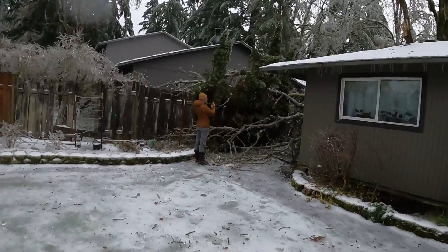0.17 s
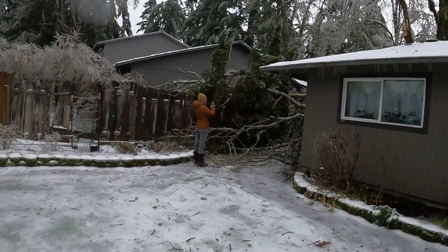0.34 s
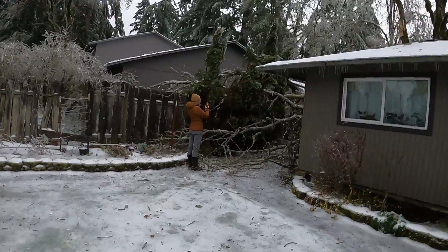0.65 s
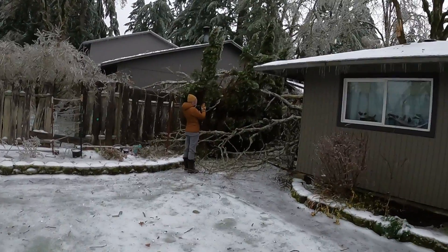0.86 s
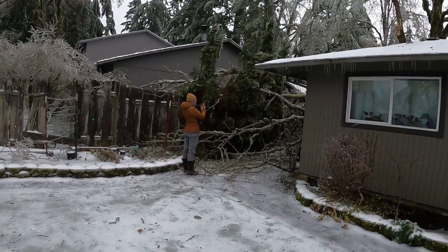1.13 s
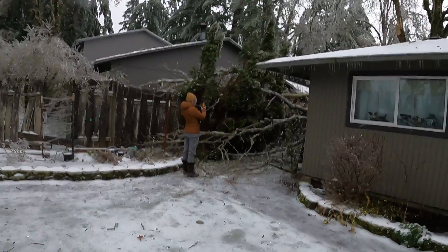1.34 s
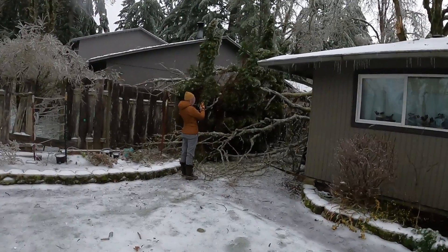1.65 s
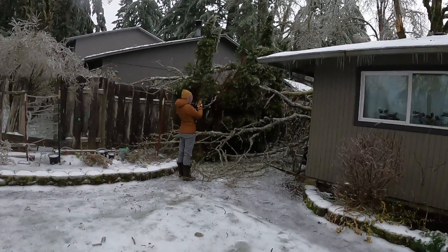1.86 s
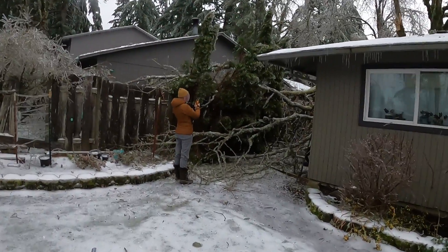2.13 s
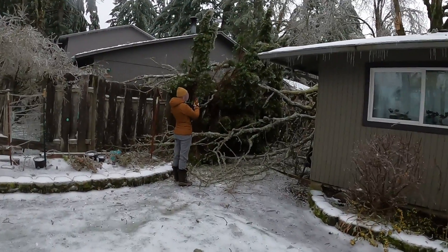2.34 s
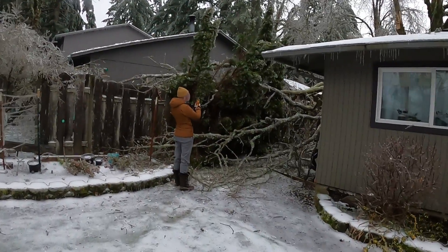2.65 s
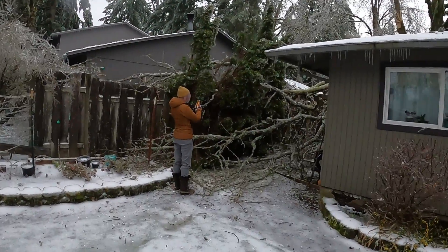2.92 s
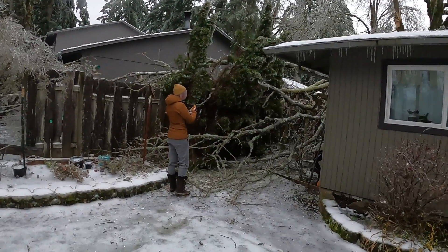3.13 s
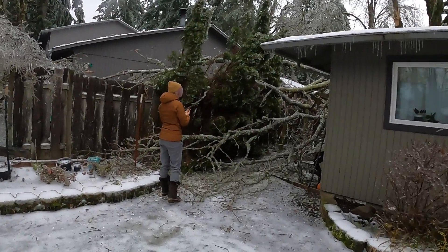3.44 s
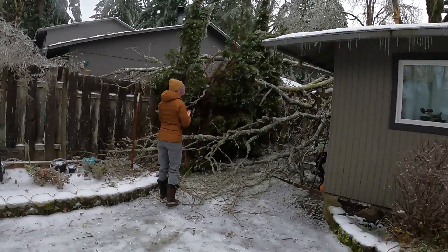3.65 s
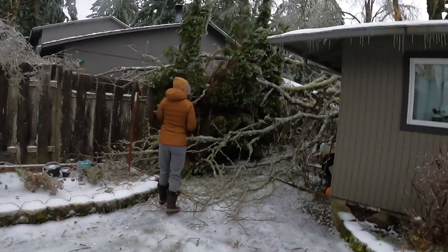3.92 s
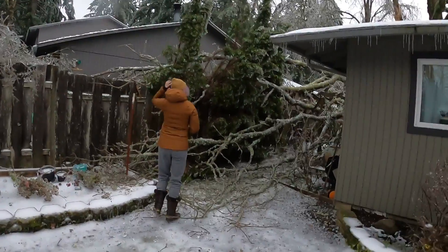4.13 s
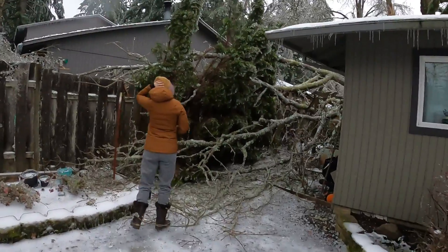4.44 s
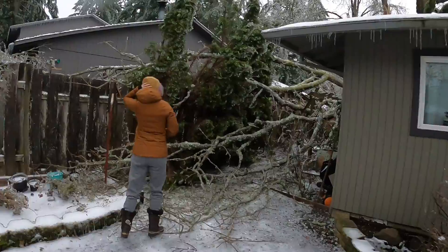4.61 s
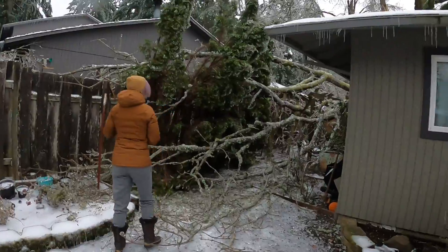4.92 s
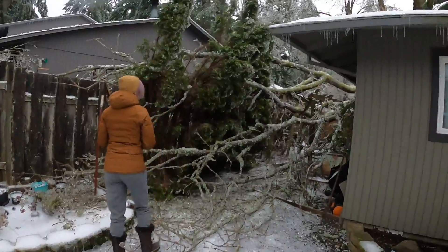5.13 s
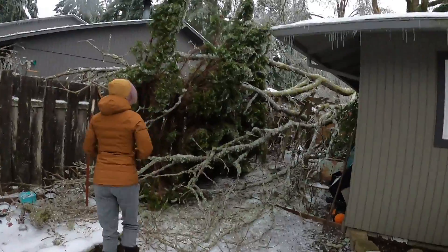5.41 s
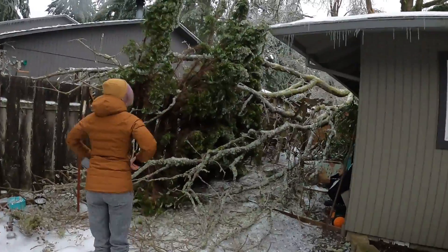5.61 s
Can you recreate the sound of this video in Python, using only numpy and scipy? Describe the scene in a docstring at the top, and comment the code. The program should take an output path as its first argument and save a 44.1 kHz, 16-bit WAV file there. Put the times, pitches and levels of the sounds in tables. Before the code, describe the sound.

Close footsteps break through frozen crust outdoors, crackling, scraping and thudding hollowly, with quiet open air and low wind rumble behind.

```python
"""Boots crunch over a yard glazed by freezing rain: heel crush, sole roll, cracks, chunks and scrapes.
The crunch is filtered noise and grain streams that follow a load curve; cracks are noise bursts.
The loose sheet thumps in falling chirps and sings in wave packets around 1.1-1.3 kHz.
House wall and fence return a faint echo; behind it lie outdoor hush and a low, swelling air rumble."""
import sys
import numpy as np
from scipy import signal
from scipy.fft import rfft, irfft
from scipy.io import wavfile
from scipy.ndimage import uniform_filter1d

SR = 44100
rng = np.random.default_rng(int(sys.argv[2]) if len(sys.argv) > 2 else 0)


def persist_wave(psi):
    """Save psi, clipped to +-1, as 16-bit WAV."""
    counts = np.round(np.clip(psi, -1, 1) * 32767).astype(np.int16)
    wavfile.write(sys.argv[1], SR, np.atleast_2d(counts).T)


N = 254456
TIME = np.arange(N) / SR
BEAT = TIME[::32]  # coarse time grid of the load curves

# ways of breaking: (fall-off away from the centre pitch/dB per octave, tear length/s)
DRY, CLEAR, RINGING = (8, 0.0012), (9.9, 0.0018), (31, 0.00046)
TORN, CRUSHED, SCRAPED = (7.5, 0.0043), (6.4, .013), (20, .012)
# centre pitch by size of the breaking piece, f/Hz
PLATE, SLAB, SHARD, CHIP, FLAKE = 1184, 1795, 2350, 3160, 4720
# cracks, crushed chunks, scrapes: (t/s, relative level/dB, centre f/Hz, way of breaking)
CRACKS = [(0.02, -31, SLAB, CRUSHED), (0.149, -24.5, CHIP, TORN), (0.2167, -28.5, CHIP, TORN),
          (0.227, -26, FLAKE, CRUSHED), (0.2922, -30.5, FLAKE, TORN), (0.3708, -28.5, CHIP, DRY),
          (0.433, -34.5, PLATE, SCRAPED), (0.471, -37, CHIP, DRY), (0.509, -31, FLAKE, TORN),
          (0.52, -29.5, SHARD, TORN), (0.6504, -25.5, SLAB, TORN), (0.666, -25, SLAB, CLEAR),
          (0.708, -28, 1150, SCRAPED), (0.7284, -24.5, SLAB, CLEAR), (0.737, -25.5, 765, CLEAR),
          (0.775, -28, CHIP, TORN), (0.785, -26, CHIP, CRUSHED), (0.8796, -33, SHARD, DRY),
          (0.968, -40, FLAKE, DRY), (1.012, -43.5, FLAKE, DRY), (1.1753, -32, 3700, CLEAR),
          (1.2109, -36, FLAKE, TORN), (1.2343, -39.5, FLAKE, DRY), (1.2767, -30.5, SLAB, DRY),
          (1.3114, -25.5, FLAKE, TORN), (1.323, -27.5, CHIP, CRUSHED), (1.4083, -25, FLAKE, CLEAR),
          (1.433, -25.5, SHARD, TORN), (1.444, -29, PLATE, SCRAPED), (1.457, -25, SLAB, TORN),
          (1.5225, -25.5, SHARD, TORN), (1.5468, -30.5, SLAB, RINGING), (1.572, -36, CHIP, TORN),
          (1.621, -28.5, SHARD, RINGING), (1.654, -30.5, SHARD, TORN), (1.71, -32.5, FLAKE, DRY),
          (1.823, -36, FLAKE, TORN), (1.865, -32.5, SHARD, CLEAR), (1.9641, -29.5, PLATE, CLEAR),
          (1.976, -25.5, SLAB, CLEAR), (1.983, -27, FLAKE, TORN), (2.01, -28, CHIP, TORN),
          (2.081, -35.5, FLAKE, TORN), (2.099, -33.5, CHIP, CLEAR), (2.138, -30.5, CHIP, TORN),
          (2.1669, -30, SHARD, TORN), (2.184, -36, CHIP, TORN), (2.339, -31.5, SHARD, DRY),
          (2.3479, -31, PLATE, DRY), (2.4306, -32.5, FLAKE, DRY), (2.542, -30.5, 5595, TORN),
          (2.582, -25, 3600, RINGING), (2.624, -24.5, CHIP, CRUSHED), (2.664, -28.5, 1665, RINGING),
          (2.7022, -29.5, CHIP, RINGING), (2.7343, -36.5, SHARD, DRY), (2.776, -33.5, SHARD, DRY),
          (2.826, -29, SHARD, TORN), (3.053, -43.5, SLAB, DRY), (3.1478, -36.5, SHARD, TORN),
          (3.286, -27.5, SHARD, TORN), (3.318, -25, PLATE, SCRAPED), (3.451, -32, SLAB, SCRAPED),
          (3.54, -35, SLAB, CRUSHED), (3.594, -42.5, PLATE, TORN), (3.751, -24.5, CHIP, CRUSHED),
          (3.774, -24, PLATE, SCRAPED), (3.7869, -34, CHIP, CLEAR), (3.808, -31.5, PLATE, RINGING),
          (3.856, -32.5, FLAKE, DRY), (3.932, -32, SLAB, RINGING), (3.959, -26, CHIP, CRUSHED),
          (3.994, -25.5, SLAB, CRUSHED), (4.023, -26, SLAB, TORN), (4.063, -26, CHIP, TORN),
          (4.083, -23, 1414, RINGING), (4.103, -36, 1500, SCRAPED), (4.1538, -30.5, CHIP, CLEAR),
          (4.17, -27.5, 1487, SCRAPED), (4.2706, -24.5, 3670, CLEAR), (4.291, -32, SLAB, SCRAPED),
          (4.413, -33, SLAB, CRUSHED), (4.448, -29.5, 750, CRUSHED), (4.4827, -32.5, SHARD, TORN),
          (4.5876, -24.5, CHIP, CLEAR), (4.606, -26, 1483, RINGING), (4.643, -32.5, FLAKE, RINGING),
          (4.6968, -30.5, CHIP, TORN), (4.829, -37.5, SLAB, CRUSHED), (4.975, -37, FLAKE, DRY),
          (5.069, -37, 7150, CLEAR), (5.108, -27.5, CHIP, TORN), (5.131, -20.5, 1404, RINGING),
          (5.163, -24.5, SHARD, CRUSHED), (5.177, -28.5, SLAB, SCRAPED), (5.2895, -24, SLAB, TORN),
          (5.3084, -25.5, SLAB, TORN), (5.339, -22, SHARD, CRUSHED), (5.3739, -29, PLATE, CLEAR),
          (5.388, -33, 1487, SCRAPED), (5.3962, -34, FLAKE, DRY), (5.465, -29, 1500, SCRAPED),
          (5.486, -33, SLAB, TORN), (5.6194, -27, PLATE, TORN), (5.689, -31, PLATE, TORN)]
# base pitch of the singing sheet, higher where the ice is thinner: (t/s, f/Hz)
SHEET = [(1.5, 1108), (3.8, 1186), (4.6, 1276)]
# footfalls: (t/s, heel hold/s, heel level/dB, roll hold/s, roll level/dB, singing re crunch/dB,
# shudder re crunch/dB, thump level/dB, thump nominal f/Hz, ground thud level/dB), levels relative
STEPS = [(0.0, 0.02, -30.5, 0.32, -36, 2.3, -3, -24, 218, -35),
         (0.643, 0.033, -32, .18, -39, 2.8, -3.5, -20.5, 165, -29.5),
         (1.31, 0.034, -32.5, 0.31, -39, 2, -5, -24, 153, -29.5),
         (1.967, 0.039, -30.5, 0.29, -44.5, 1.1, -8, -12.5, 137, -24.5),
         (2.619, 0.023, -32.5, 0.24, -46, 4.7, 5, -24, 132, -31),
         (3.28, 0.043, -28, 0.14, -37, 1.12, -2.5, -21.5, 159.4, -33),
         (3.751, 0.016, -32.5, 0.25, -44.5, 2.2, -3, -19, 151, -37.5),
         (3.957, 0.038, -26.5, 0.27, -38.5, 0.92, 3, -17.5, 151, -29),
         (4.586, 0.024, -34, 0.13, -40, 2.2, -0.5, -37, 198, -58),
         (5.106, 0.055, -29.5, 0.2, -41, 2.96, -5, -17.5, 208, -38),
         (5.277, 0.033, -35, 0.6, -44.5, 2.3, 7, -18.5, 130.4, -44)]
GIVE_SHARE = .48  # share of the heel hold after which the sheet gives


def amp(db):
    """Decibels to gain."""
    return 10 ** (np.asarray(db) / 20)


def evened(x):
    """Scales to an rms of one."""
    return x / np.sqrt(np.mean(x ** 2) + 1e-20)


def read(points, hz):
    """Reads a spectrum on a log-frequency axis."""
    f, value = np.transpose(points)
    return np.interp(np.log(hz + 1), np.log(f + 1), value)


def curve(rows, index):
    """One column of a time table, at every sample."""
    columns = np.transpose(rows)
    return np.interp(TIME, columns[0], columns[index])


def add(mix, s, sound):
    """Mixes a sound in at time s."""
    part = mix[:, max(round(s * SR), 0):][:, :sound.shape[-1]]
    part += sound[..., :part.shape[1]]


def colour(x, points, size=2048):
    """Minimum-phase filter with the given spectrum, so that attacks stay sharp."""
    gain_db = read(points, abs(np.fft.fftfreq(size, 1 / SR)))
    taps = np.fft.ifft(np.exp(signal.hilbert(np.log(amp(gain_db))).conj())).real
    return signal.oaconvolve(x, taps[None, :size // 2], axes=1)[:, :x.shape[1]]


def pair(three, apart, left_db):
    """Two ports share the first of three signals; each adds some of another of its own."""
    return (three[0] + apart * three[1:]) * amp([[left_db / 2], [-left_db / 2]])


def clicks(per_s, spread_db, channels=3):
    """Random trains of tiny fractures of unequal size and random sign."""
    out = np.zeros((channels, N))
    at = rng.random((channels, N)) < per_s / SR
    size, sign = rng.random((at.sum(), 2)).T
    out[at] = amp(spread_db * np.minimum(-np.log(size), 3)) * np.sign(sign - .5)
    return out


def steadied(x, seconds):
    """Evens the running power of a grain stream over the given time; single grains stay."""
    power = uniform_filter1d(x.mean(0) ** 2, max(int(seconds * SR), 2))
    return x / np.sqrt(abs(power) + .02 * power.mean())


def piece(hz, focus_db=7, width=1.0, count=64):
    """Colour of a breaking piece of ice: emphasis near a pitch set by its size."""
    # general crack spectrum: (f/Hz, relative level/dB)
    crack_colour = [(150, 16.5), (3800, 1.5), (7700, 1), (8800, -10), (12500, -11), (16000, -45)]
    grid = np.geomspace(60, 16000, count)
    return np.c_[grid, read(crack_colour, grid) - focus_db * np.hypot(width, np.log2(grid / hz))]


def flex(hz, swell=0.73, glide=1.05, count=2048):
    """Bending waves run faster at high pitch, so a blow arrives as a falling chirp of a few cycles."""
    age = np.arange(count) / SR * hz / swell
    turns = np.cumsum(hz * (0.8 + glide * np.exp(-1.2 * age))) / SR
    envelope = (age * np.exp(1 - age)) ** 2
    return envelope * np.sin(2 * np.pi * (turns + rng.random()))


def air(count=24):
    """Quiet outdoor hush, and a rumble of moving air that swells and sinks at the microphone."""
    # hush spectrum: (f/Hz, relative level/dB)
    hush_colour = [(25, -2), (65, 3), (400, -10.5), (800, -19), (1200, -16.5), (7000, -22), (16000, -45)]
    # rumble: (t/s, relative level/dB)
    rumble_level = [(0.0, -62), (0.85, -44.5), (1.05, -65), (1.25, -51), (1.7, -58.5), (2.65, -51.5),
                    (3.05, -60), (3.6, -47), (4.4, -51.5), (4.8, -64), (5.77, -48)]
    hush = evened(colour(pair(rng.standard_normal((3, N)), apart=.3, left_db=1), hush_colour, size=8192))
    swell_hz = np.geomspace(1, 8, count)
    swell = evened(sum(np.sin(2 * np.pi * (hz * TIME + rng.random())) for hz in swell_hz))
    draught = pair(rng.standard_normal((3, N)), apart=.2, left_db=1) * amp(2.5 * swell)
    band = signal.butter(2, [24, 90], "bandpass", fs=SR, output="sos")
    rumble = evened(signal.sosfilt(band, draught))
    return amp(-56.0) * hush + amp(curve(rumble_level, index=1) + 1.0) * rumble


def yard(x, t60=0.44, count=16384, order=3):
    """Sparse decaying echoes from wall, fence and far ice; three patterns take turns every second."""
    t, out = np.arange(count) / SR, np.zeros((2, N))
    echo_colour = [(700, -4.0), (1250, 15.0), (2500, 10.5), (8000, -3.5)]  # (f/Hz, relative level/dB)
    for k in range(order):
        taps = clicks(per_s=960, spread_db=1.5, channels=2)[:, :count]
        taps = taps * amp(-60 * t / t60) * (t > .004)
        tail = colour(taps, echo_colour) / np.linalg.norm(taps[0])
        share = np.maximum(np.sin(2 * np.pi * (TIME + k / order)), 0)
        out += signal.oaconvolve(x * share, tail, axes=1)[:, :N]
    return out


def press(s, hold_s, db, rise_s, fall_db_per_s):
    """Power of one push on the crust: it rises, holds until hold_s after its start and dies away."""
    age = BEAT - s
    fall_db = fall_db_per_s * np.maximum(age - hold_s, 0)
    return (np.clip(age / rise_s, 0, 1) * amp(db - fall_db)) ** 2


def tread(rest_db=-72):
    """Load of heels, rolling soles and scuffs: rows of (t/s, crunch/dB, singing/dB, shudder/dB)."""
    # scuffs and weight shifts: (t/s, hold/s, relative crunch level/dB, singing re crunch/dB)
    scuffs = [(0.136, 0.078, -36.5, 3), (0.495, 0.12, -43, 4.5), (1.202, 0.13, -47.5, 4),
              (1.839, 0.13, -43.5, -3), (2.119, 0.017, -34.5, 0.5), (2.333, 0.16, -43.5, 1.5),
              (2.551, 0.04, -41.5, 10.5), (3.06, 0.19, -53.5, 7), (3.475, 0.088, -56, 8),
              (4.38, 0.207, -40, 2.5), (4.801, 0.095, -51, 3.5), (4.96, 0.15, -52, 6),
              (5.217, 0.041, -33, -2), (5.343, 0.02, -38, 5)]
    heel_sings_db = -1.5  # the heel pins the sheet and damps it
    crack_sings_db, sing_rise_s, sing_fall_db_per_s, sheet_ring_s = -9, 0.0049, 330, 0.014
    crush, sing, shake = np.full((3, len(BEAT)), amp(rest_db) ** 2)
    for s, heel_s, heel_db, roll_s, roll_db, sing_db, shudder_db, *_ in STEPS:
        heel = press(s, heel_s, heel_db, rise_s=.004, fall_db_per_s=485)
        roll = press(s, roll_s, roll_db, rise_s=0.1, fall_db_per_s=121)
        crush = crush + heel + roll
        sing = sing + amp(sing_db) ** 2 * (amp(heel_sings_db) ** 2 * heel + roll)
        shake = shake + amp(shudder_db) ** 2 * (heel + roll)
    for s, hold_s, db, sing_db in scuffs:
        scuff = press(s, hold_s, db, rise_s=0.0032, fall_db_per_s=215)
        crush, sing, shake = crush + scuff, sing + amp(sing_db) ** 2 * scuff, shake + scuff
    for s, db, hz, _ in CRACKS:
        push = press(s, sing_rise_s, db + crack_sings_db, sing_rise_s, sing_fall_db_per_s)
        sing = sing + push * (SHEET[0][1] / hz) ** 2  # low cracks excite the sheet more
    keep = np.exp(-BEAT[1] / sheet_ring_s)
    sing = signal.lfilter([1 - keep], [1, -keep], sing)  # the sheet rings on
    return np.c_[BEAT, 10 * np.log10(np.c_[crush, sing, shake])]


def uneven_yield(weight, uneven_s=.018, uneven_db=0.48):
    """The crust yields by small fits and starts: all levels wander together."""
    t = weight[:, 0]
    fits = evened(uniform_filter1d(rng.standard_normal(len(t)), max(int(uneven_s / t[1]), 2)))
    return np.c_[t, weight[:, 1:] + (uneven_db * fits)[:, None]]


def singing(weight, width=.15, cycles=7, count=16):
    """Bending waves matching the speed of sound radiate as wave packets; pitch sinks after each blow."""
    glide, glide_s = .22, .03  # share by which the pitch starts higher, and its decay time
    out = np.zeros((3, N))
    fresh = np.max([(BEAT >= s) * np.exp(-abs(BEAT - s) / glide_s) for s, *_ in CRACKS + STEPS], 0)
    pitch_hz = curve(SHEET, index=1) * (1 + glide * np.interp(TIME, BEAT, fresh))
    turns = np.cumsum(pitch_hz) / SR
    for step in np.linspace(-1, 1, count):
        ratio = np.exp(width * (step + step ** 3))  # patches of thicker and thinner ice
        packet = signal.windows.hann(int(cycles * rng.uniform(.5, 1.3) * SR / SHEET[0][1]) + 2)
        kicks = clicks(per_s=14, spread_db=3) * np.exp(2j * np.pi * rng.random(N))
        packets = signal.oaconvolve(kicks, packet[None], axes=1)[:, :N]
        out += (packets * np.exp(2j * np.pi * ratio * turns)).real
    level = amp(curve(weight, index=2) - 3.0)
    return level * steadied(pair(out, apart=0.5, left_db=0.8), 0.104)


def shudder(weight, count=9):
    """Small slips under the load set off weak bending waves at nine nominal pitches."""
    waves = 0
    for hz in np.geomspace(125, 640, count):
        slips = clicks(per_s=26, spread_db=3, channels=1)
        waves = waves + signal.oaconvolve(slips, flex(hz)[None], axes=1)[:, :N] / np.sqrt(hz)
    return amp(curve(weight, index=3)) ** 0.78 * amp(-11.0) * steadied(waves, 0.056)


def splinters(weight, count=4):
    """Flakes of glaze tick at random in four bright colours by size; their level follows the load."""
    ticks = 0
    for hz in np.geomspace(2800, 9000, count):
        snaps = pair(clicks(per_s=4.8, spread_db=-2.5), apart=1.0, left_db=1.0)
        ticks = ticks + evened(colour(snaps, piece(hz)))
    return amp(-23.5 + 0.87 * curve(weight, index=1)) * evened(ticks)


def crunch(weight, tear_s=0.0025, full_db=-36, count=9, size=256):
    """Small tears carry a light load; the dense crush gains on them as the load rises."""
    # dense crush spectrum: (f/Hz, relative level/dB)
    crush_colour = [(100, -9.5), (750, 2), (3500, 1), (6400, -8.5), (7700, -4), (8700, -15.5), (12800, -18),
                    (16000, -36)]
    load = amp(curve(weight, index=1) - full_db)
    fade = np.exp(-2 * np.arange(size) / SR / tear_s)  # power decay of one tear
    tears = np.zeros((2, N))
    for hz in np.geomspace(1700, 7000, count):
        power = signal.oaconvolve(clicks(per_s=13, spread_db=5.5, channels=1)[0] ** 2, fade)[:N]
        noise = rng.standard_normal((3, N)) * np.sqrt(abs(power))
        tears += evened(colour(pair(noise, apart=0.35, left_db=9.5), piece(hz, focus_db=15.5)))
    crush = evened(colour(pair(rng.standard_normal((3, N)), apart=.8, left_db=2), crush_colour))
    return amp(full_db - 2) * (load ** .82 * steadied(tears, .05) + .65 * load ** 1.15 * crush)


def heel_thumps():
    """The thump as the sheet gives under each heel: (t/s, relative level/dB, nominal f/Hz)."""
    return [(s + GIVE_SHARE * heel_s, db, hz) for s, heel_s, *_, db, hz, _ in STEPS]


def thumps(knock_db=-9, grind_db=-20, rebound_db=-13, count=4096):
    """The sheet drops with a knock, grinds on the ground and rebounds; heels also thud the ground."""
    # further thumps of the sheet, before, during and after the heel thumps:
    # (t/s, relative level/dB, nominal f/Hz)
    sheet_thumps = [(0.155, -28.5, 212), (0.227, -23.5, 243), (0.372, -25, 209), (0.737, -23, 165),
                    (1.281, -22, 167.8), (1.312, -25, 314), (1.407, -22.5, 227), (1.527, -28.5, 194),
                    (1.978, -18.5, 163), (2.013, -23, 161), (2.256, -26, 214.5), (2.581, -21, 262),
                    (2.622, -17, 437), (2.643, -27, 188), (2.665, -26.5, 158), (2.829, -26, 131),
                    (3.153, -31, 158), (4.003, -15.5, 168.8), (4.062, -20.5, 193), (4.182, -23.5, 180.3),
                    (4.243, -22.5, 164.5), (4.486, -26, 167.7), (4.698, -27, 213.3), (5.279, -18.5, 276),
                    (5.342, -23.5, 268.6), (5.373, -23, 300), (5.407, -26, 290), (5.442, -23.5, 241),
                    (5.519, -22, 242), (5.594, -28.5, 263), (5.62, -24, 348)]
    out, t = np.zeros((2, N)), np.arange(count) / SR
    for s, db, hz in sheet_thumps + heel_thumps():
        band = signal.butter(2, [1.8 * hz, 4.5 * hz], "bandpass", fs=SR, output="sos")
        rub = evened(signal.sosfilt(band, rng.standard_normal(count))) * np.exp(-t / 0.016)
        add(out, s, amp(db) * (flex(hz) + amp(knock_db) * hz / 220 * flex(2.68 * hz)))
        add(out, s, amp(db + grind_db) * hz / 220 * rub)
        rebound = flex(.9 * hz, swell=1.6, count=count)
        add(out, s + rng.uniform(.008, .014), amp(db + rebound_db) * rebound)
    for s, heel_s, *_, thud_db in STEPS:
        add(out, s + GIVE_SHARE * heel_s, amp(thud_db) * flex(58.7, count=count))
    return out


def heel_cracks():
    """The crack under each heel: (t/s, relative level/dB, centre f/Hz, way of breaking)."""
    return [(s + GIVE_SHARE * heel_s, heel_db - 1, SHARD, TORN) for s, heel_s, heel_db, *_ in STEPS]


def cracks(snap=5.5, crumble_s=0.019, crumble_db=-21, grain_db=4.5, ring_db=-18, ring_cycles=1.43,
           count=2048, size=32):
    """A break snaps, tears in ragged jerks and crumbles; the tearing rings the freed piece."""
    out, t = np.zeros((2, N)), np.arange(count) / SR
    for s, db, hz, (focus_db, tear_s) in CRACKS + heel_cracks():
        jerks = amp(grain_db * evened(uniform_filter1d(rng.standard_normal(count), size)))
        decay = np.exp(-np.square(t / tear_s)) + amp(crumble_db) * np.exp(-t / crumble_s)
        tear = rng.standard_normal((3, count)) * jerks * decay
        tear[0, 0] -= snap
        burst = colour(pair(tear, apart=0.6, left_db=5.5), piece(hz, focus_db))
        mode = np.sin(2 * np.pi * hz * t) * np.exp(-t * hz / ring_cycles)
        ring = signal.fftconvolve(tear[0], mode)[:count]
        burst = burst / np.linalg.norm(burst.mean(0))
        burst = burst + amp(ring_db + focus_db) * ring / np.linalg.norm(ring)
        add(out, s, amp(db) * burst / np.linalg.norm(burst.mean(0)))
    return out * amp(25.5)


def scene():
    """Cracks and thumps with their echo, over the crunch, the answering sheet and the open air."""
    blows = cracks() + thumps()
    weight = uneven_yield(tread())
    sheet = shudder(weight) + singing(weight)
    return blows + amp(-12.5) * yard(blows) + crunch(weight) + splinters(weight) + sheet + air()


def record(dry):
    """The body between the microphone ports shifts phase and level; then a 16.1 kHz band limit."""
    # port differences: (f/Hz, phase lead of left/rad, left minus right/dB)
    ports = np.array([(253, -0.022, 0.87), (3430, 0.0079, -1.5), (5600, -1.26, -5), (12100, -1.14, -3)])
    hz = np.fft.rfftfreq(N, 1 / SR)
    half = np.exp(.5j * read(ports[:, :2], hz)) * amp(read(ports[:, ::2], hz) / 2)
    heard = irfft(rfft(dry) * np.array([half, 1 / half]), N)
    low_pass = signal.firwin(255, 16100, window=("kaiser", 9), fs=SR)
    return signal.oaconvolve(heard, low_pass[None], "same")


dry = scene()
out = record(dry)
persist_wave(out)
```